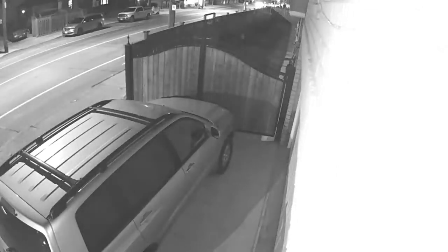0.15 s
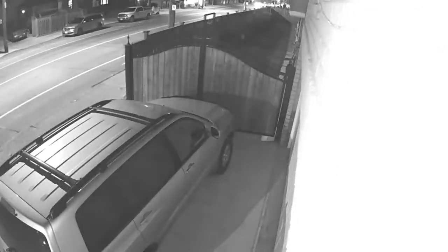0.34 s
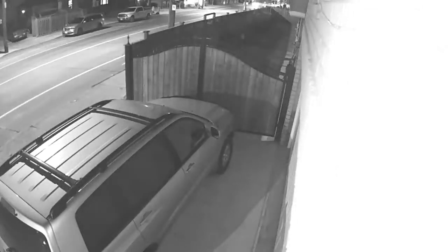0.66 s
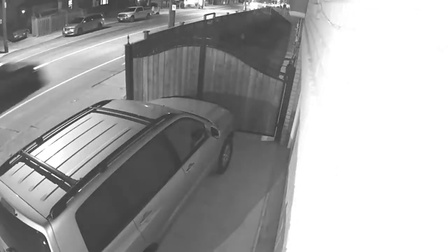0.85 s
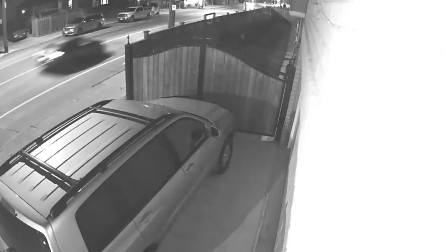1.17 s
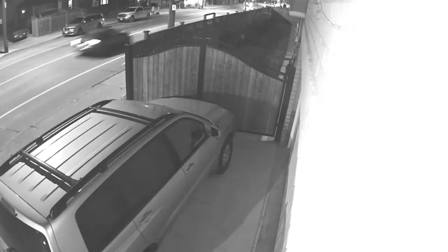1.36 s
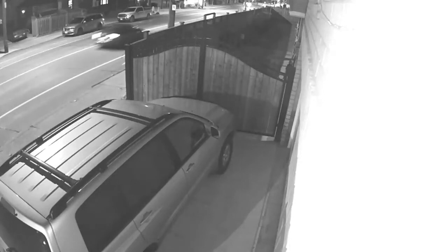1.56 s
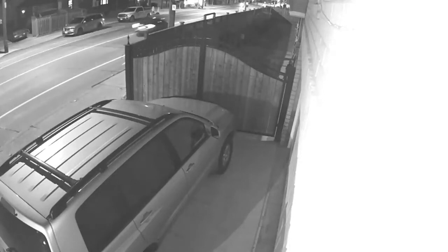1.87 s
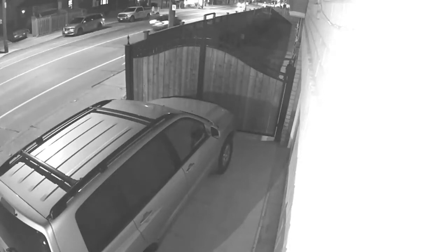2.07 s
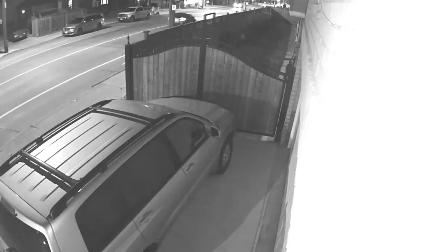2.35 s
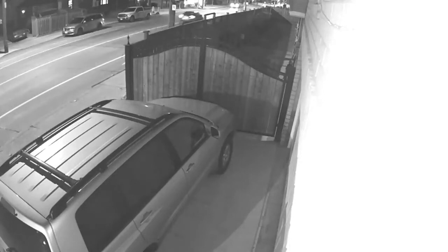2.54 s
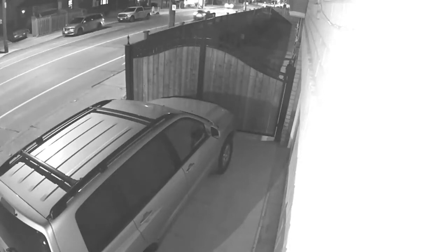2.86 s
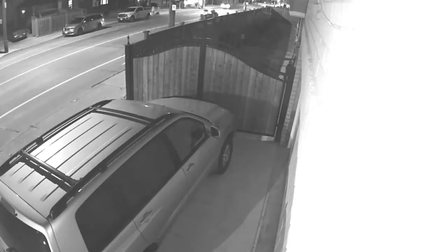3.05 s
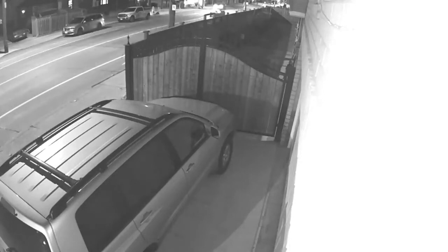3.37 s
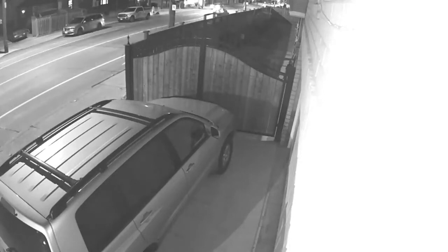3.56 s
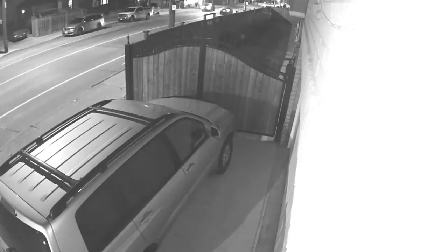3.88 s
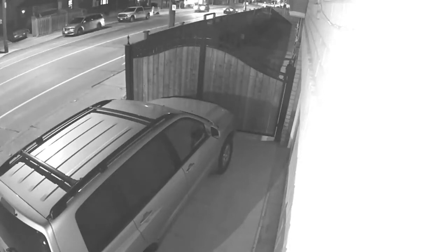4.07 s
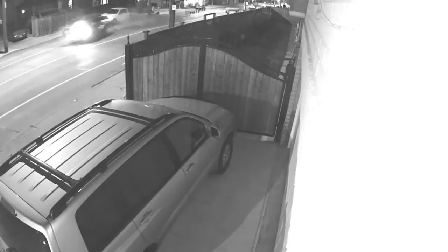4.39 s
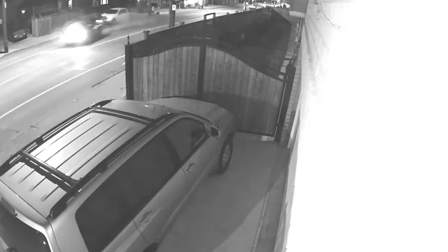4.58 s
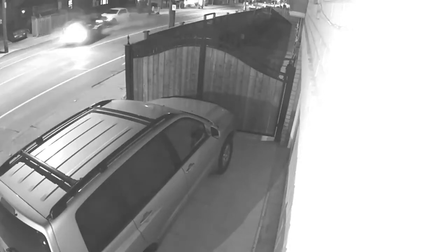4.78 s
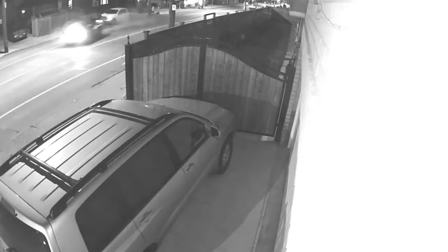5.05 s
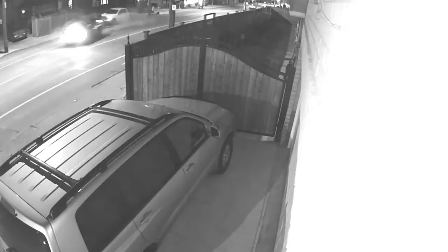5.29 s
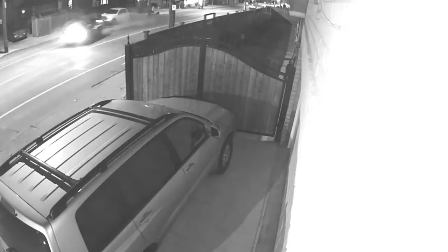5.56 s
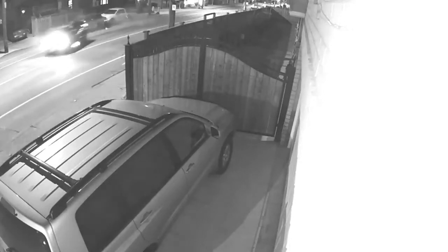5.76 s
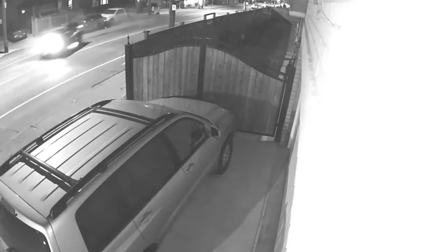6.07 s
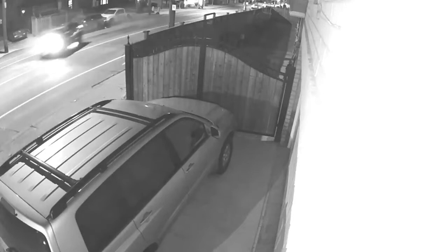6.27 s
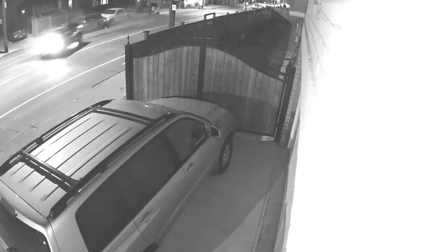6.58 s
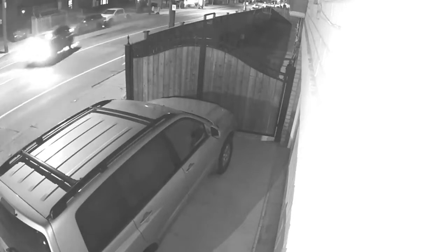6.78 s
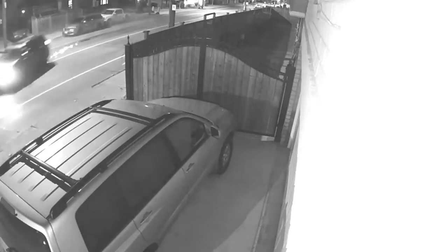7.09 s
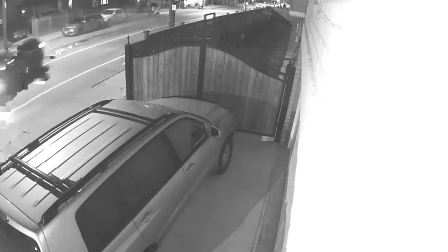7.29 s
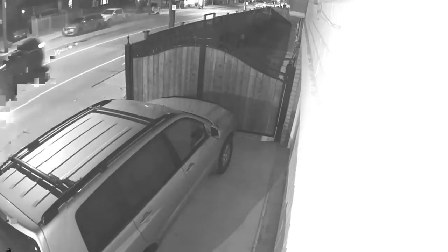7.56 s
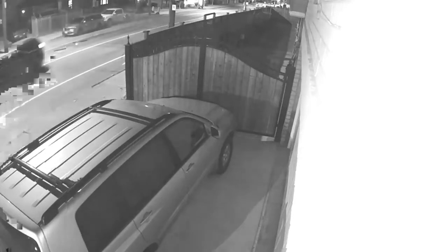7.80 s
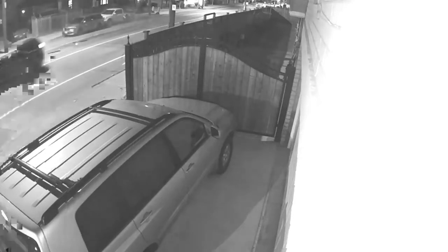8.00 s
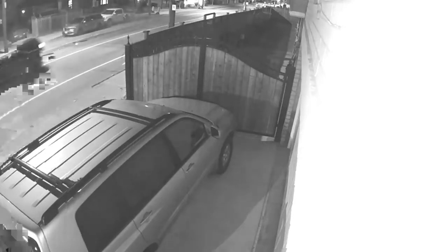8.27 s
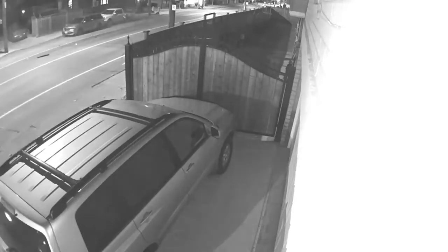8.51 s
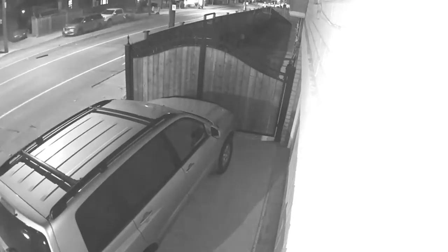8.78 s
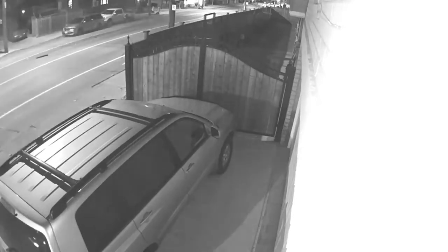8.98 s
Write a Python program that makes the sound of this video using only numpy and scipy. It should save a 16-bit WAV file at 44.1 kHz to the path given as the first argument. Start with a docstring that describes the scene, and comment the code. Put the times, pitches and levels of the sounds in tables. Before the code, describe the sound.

A quiet night street heard through a small, ringing mono microphone. From 0 s a car sweeps past, nearest around 0.5 s, with a soft tyre whoosh, humming tread and low exhaust drone, fading by about 2 s behind a fence. Distant traffic murmurs and its hiss gradually rises; the signal drops out briefly near 4.4 s. At 5.04 s a violent crash hits abruptly and overloads: low thumps, buckling steel, a short squeal and bursting glass, decaying over a second with echo. Sharp knocks clatter at 5.7-5.9 s, and a steel tube rings high around 6.0 s. A heavy blow at 6.17 s starts continuous gritty scraping on asphalt, with loud metallic squeals at 6.5 and 6.8 s. Another tiny cut comes at 7.2 s. Scraping continues with irregular knocks and groans, a cluster of bangs at 8.4-8.7 s, and rough grinding surges past 9 s.

```python
"""A car rolls by on a night street; later another crashes, then metal rings, scrapes and knocks on asphalt.
Tyres are coloured noise shaped by distance and direction; steel and glass are dense random fractures.
A bouncing tube is a set of decaying modes; dragged wreckage is stick-slip grains and squealing bands.
A small mono microphone rings near 2 kHz and overloads, and its signal cuts out twice."""
import sys
import numpy as np
from scipy import signal
from scipy.fft import rfft, irfft
from scipy.io import wavfile
from scipy.ndimage import uniform_filter1d, map_coordinates

SR = 44100
rng = np.random.default_rng(int(sys.argv[2]) if len(sys.argv) > 2 else 0)


def generate_wav(sig):
    """Save sig (samples, or channels by samples) to the path in sys.argv[1] as 16-bit PCM at SR."""
    pcm = np.round(np.clip(np.atleast_2d(sig).T, -1, 1) * 32767).astype(np.int16)
    wavfile.write(sys.argv[1], SR, pcm)


N = 403074
TIME = np.arange(N) / SR
FREQ = np.fft.rfftfreq(N, 1 / SR)
IMPACT_S = 5.0385

# spectrum of metal and grit dragged on asphalt: frequency_hz, level_db
SCRAPE_SPECTRUM = [(30, -7), (90, -13), (160, -9.5), (260, -6), (450, -8.5), (720, -9), (1000, -8.5),
                   (1300, -7.5), (1700, 1.5), (2100, -6), (2500, -5), (4100, -0.5), (6000, -5),
                   (8000, -11.5), (12000, -16.5), (15000, -41)]


def undb(db):
    """Amplitude gain is the exponential of a level in decibels."""
    return 10 ** (np.asarray(db) / 20)


def unit(x):
    """Normalization of signal power: scale to rms 1."""
    return x / np.sqrt(np.mean(x ** 2))


def gains(table):
    """Levels interpolated linearly in decibels give one gain curve per column."""
    s, *columns = np.transpose(table)
    return [undb(np.interp(TIME, s, column)) for column in columns]


def spectrum(points):
    """A spectral envelope in dB, interpolated on a logarithmic frequency axis."""
    hz, db = np.transpose(points)
    return np.interp(np.log(FREQ + 1), np.log(hz), db)


def colour(x, db):
    """Minimum-phase filtering: folding the cepstrum forward makes the response causal."""
    size = 4096
    log_gain = np.log(undb(np.interp(np.fft.rfftfreq(size, 1 / SR), FREQ, db)))
    cepstrum = irfft(log_gain)
    cepstrum[1:size // 2] *= 2
    cepstrum[size // 2 + 1:] = 0
    response = irfft(np.exp(rfft(cepstrum)))
    return signal.oaconvolve(x, response)[:N]


def band(x, lo_hz, hi_hz, order=4):
    """Butterworth band-pass: a maximally flat pass band."""
    edges = [lo_hz, min(hi_hz, SR / 2 - 100)]
    return signal.sosfilt(signal.butter(order, edges, "band", fs=SR, output="sos"), x)


def walk(rate):
    """Slow random fluctuation of rms 1: Gaussian knots, rate per second, joined by straight lines."""
    knots = rng.standard_normal(8192)
    return unit(np.interp(TIME * rate, np.arange(len(knots)), knots))


def grains(rate, spread_db):
    """Shot noise of tiny fractures and slips, rate per second: many weak, a few strong."""
    strength = undb(spread_db * np.minimum(rng.exponential(size=N), 5))
    sign = rng.choice([-1, 1], N)
    return unit((rng.random(N) < rate / SR) * strength * sign)


def fade(t, t60):
    """Exponential damping: the level falls 60 dB in t60 seconds."""
    return np.exp(-np.log(1000) * t / max(t60, 1e-3))


def envelope(start, attack, length, t60):
    """Build-up and decay: rise from start, hold until length has passed, then die away."""
    t = TIME - start
    return np.clip(t / max(attack, 1e-4), 0, 1) * fade(np.maximum(t - length, 0), t60)


def add(out, s, sound):
    """Linear superposition: mix a sound in at time s."""
    i = int(s * SR)
    out[i:i + len(sound)] += sound[:N - i]


def street(x, t60, wet_db):
    """Reverberation: direct sound plus scattered echoes from fence, cars and fronts, with little treble."""
    t = TIME[:SR // 2]
    echoes = rng.standard_normal(len(t)) * fade(t, t60)
    response = band(echoes / np.linalg.norm(echoes), lo_hz=248, hi_hz=5450, order=1) * undb(wet_db)
    response[0] += 1  # direct sound
    return signal.oaconvolve(x, response / np.linalg.norm(response))[:N]


def shifting(x, depth_db, rate, count=70):
    """Moving resonances: narrow peaks swell and fade as the contact point moves over the bent metal."""
    hz, s, frames = signal.stft(x, SR, nperseg=1024)
    peaks = rng.standard_normal((count + 2, 512))
    places = np.meshgrid(count * np.sqrt(hz / hz[-1]), s * rate, indexing="ij")
    swell = undb(depth_db * map_coordinates(peaks, places, order=1))
    return signal.istft(frames * swell, SR)[1][:N]


def singing(table, attack_s, t60):
    """Sustained resonance: each row excites one narrow band for a while, then lets it die away."""
    out, t = np.zeros(N), TIME[:3 * SR]
    for s, length, hz, width, db in table:
        ring = unit(band(rng.standard_normal(len(t)), hz - width / 2, hz + width / 2, order=2))
        add(out, s, ring * undb(db) * envelope(0, attack_s, length, t60)[:len(t)])
    return out


def passing_car(ground_db=-6):
    """Spherical spreading and directivity shape tyre noise until a fence shadows it; the exhaust drones."""
    # tyre noise nearby: frequency_hz, level_db
    tyre_spectrum = [(60, -9), (100, -13), (170, 3), (430, 1.5), (650, -17), (900, -0.5), (1300, 0.5),
                     (1750, -0.5), (2700, -5), (3500, -7), (5000, -14.5), (8000, -24), (12000, -29.5),
                     (15000, -39)]
    # exhaust drones: start_s, length_s, level_db (relative to exhaust_db)
    drone_spells = [(.24, 1.08, -1), (1.74, 0.35, -8)]
    pass_s, speed_m_s, lane_m = 0.46, 15.4, 7.3  # moment, speed and distance of closest approach
    roar_db, rumble_db, hiss_db = -44, -50, -44.5  # at the nearest point
    exhaust_db = -46.5
    roar_horn_db, hiss_horn_db, hiss_ahead_db = 12.5, 7, 5  # tyres beam along the road, hiss mostly forward
    fence_s, fence_db_per_s = 1.14, 7
    ground_lag_s = .0006  # asphalt echo at the nearest point

    along = speed_m_s * (TIME - pass_s)
    distance = np.hypot(along, lane_m)
    bearing, nearness = along / distance, lane_m / distance
    tyres = colour(rng.standard_normal(N), spectrum(tyre_spectrum))
    # the echo off the asphalt catches up as the car leaves, so the whoosh sweeps upward
    scattered = uniform_filter1d(tyres, size=5)  # rough asphalt returns less treble
    echo_time = TIME - ground_lag_s * np.sqrt(nearness)
    tyres = tyres + undb(ground_db) * np.interp(echo_time, TIME, scattered)

    roar = undb(roar_db + roar_horn_db * bearing ** 2) * unit(band(tyres, 490, 2500))
    hiss_level_db = hiss_db + hiss_horn_db * bearing ** 2 - hiss_ahead_db * bearing
    hiss = undb(hiss_level_db) * unit(band(tyres, 3160, 15000))
    rumble = undb(rumble_db) * unit(band(tyres, 26, 760))
    shadow = undb(-fence_db_per_s * np.maximum(TIME - fence_s, 0))
    drone = sum(undb(exhaust_db + db) * envelope(s, 0.14, length, t60=0.55)
                for s, length, db in drone_spells)
    exhaust_hz = 39.7 * (1 + 0.016 * walk(12))
    exhaust = np.sin(2 * np.pi * np.cumsum(exhaust_hz) / SR)
    # faint high hiss of the tyres, weighted slightly towards the departing side
    high_hiss = undb(-71.5 + 3.4 * bearing) * unit(band(tyres, 7860, 14000))
    return nearness * (shadow * (roar + hiss + high_hiss) + rumble) + drone * unit(exhaust)


def traffic(rumble_db=-9.5):
    """Broadband rolling noise: far tyres roar and hiss under the passing car, all echoed by the street."""
    # tyre noise from afar: frequency_hz, level_db
    far_spectrum = [(30, 2.5), (100, -1.5), (300, -8.5), (500, -8.5), (720, -3.5), (970, -0.5),
                    (1200, -4.5), (1420, -5), (1650, -3), (2800, -8.5), (3700, -18.5), (4600, -17.5),
                    (7500, -35.5), (10000, -36.5), (11500, -34), (12500, -38), (15000, -39)]
    # traffic up the street: time_s, tread_roar_db, hiss_db
    far_levels = [(1.5, -45.5, -56), (2.6, -46, -53), (3.2, -45.5, -50.5), (3.6, -47.5, -53.5),
                  (3.95, -46, -49), (4.65, -45, -47), (5.04, -43.5, -45)]
    roar, hiss = gains(far_levels)
    noise = colour(rng.standard_normal(N), spectrum(far_spectrum))
    treads = unit(band(noise, 560, 2480)) + undb(rumble_db) * unit(band(noise, 28, 555))
    far = roar * treads + hiss * unit(band(noise, 2940, 15000))
    return street(far + passing_car(), t60=0.25, wet_db=-9.5) * undb(0.51 * walk(24))


def tread_hums():
    """Narrow-band resonance: tyre treads hum on the road."""
    # hums: start_s, length_s, frequency_hz, width_hz, level_db
    hum_bands = [(0, 0.19, 1800, 280, -41.5), (0, .45, 935, 200, -47), (.75, 0.57, 2140, 300, -52),
                 (1.8, 2.4, 953, 65, -52.5), (1.4, 2.0, 1420, 70, -51.5), (4.1, 1.1, 2320, 110, -51)]
    return singing(hum_bands, attack_s=0.078, t60=1.7)


def collision(attack_s=0.0022):
    """Impulsive fracture: panels buckle in dense cracks, the bodies boom, glass bursts and rains down."""
    # crumpling bodywork and glass: frequency_hz, level_db
    crumple_spectrum = [(30, -2), (90, -1.5), (170, 0.5), (450, -2.5), (700, -4.5), (1000, -9.5),
                        (1700, -7), (2300, -0.5), (3000, -0.5), (4000, -2.5), (6000, -5), (8000, -13.5),
                        (11000, -16), (15000, -39)]
    steel_db, steel_hold_s, steel_t60_s = -13.5, .2, 0.88
    glass_db, glass_hold_s, glass_t60_s = -13, 0.22, 0.78
    boom_db, boom_rise_s, boom_hold_s, boom_t60_s = -22, 0.034, 0.048, 2.14
    # small debris keeps falling; level relative to steel and glass
    settle_db, settle_hold_s, settle_t60_s = -21.5, 0.76, 4.1

    settle = undb(settle_db) * envelope(IMPACT_S, attack_s, settle_hold_s, settle_t60_s)
    steel = undb(steel_db) * np.hypot(envelope(IMPACT_S, attack_s, steel_hold_s, steel_t60_s), settle)
    glass = undb(glass_db) * np.hypot(envelope(IMPACT_S, attack_s, glass_hold_s, glass_t60_s), settle)
    boom = undb(boom_db) * envelope(IMPACT_S, boom_rise_s, boom_hold_s, boom_t60_s)
    tone = spectrum(crumple_spectrum)
    cracks = street(colour(grains(rate=5000, spread_db=3.5), tone), t60=0.93, wet_db=-4.5)
    shards = street(colour(grains(rate=7000, spread_db=1.5), tone), t60=.15, wet_db=-9.0)
    cracks = shifting(cracks, depth_db=1.0, rate=16)
    wreck = steel * unit(band(cracks, 267, 2730)) + boom * unit(band(cracks, 22, 197))
    return wreck + glass * unit(band(shards, 2430, 17200))


def squeals():
    """Narrow-band resonance: steel edges squeal, panels groan, the ringing tube sings briefly near 3.4 kHz."""
    # squeals, groans and the tube's brief note: start_s, length_s, frequency_hz, width_hz, level_db
    squeal_bands = [(5.06, 0.061, 2320, 201, -19.5), (5.03, 0.058, 2830, 600, -13),
                    (5.12, 0.16, 2990, 350, -26), (6.2, .11, 2140, 345, -23),
                    (6.24, 0.11, 4300, 500, -21.5), (6.52, 0.23, 4250, 554, -15),
                    (6.81, 0.13, 4040, 303, -16.5), (6.86, 0.069, 5100, 700, -18),
                    (7.01, 0.12, 315, 40, -27.5), (7.06, 0.052, 2170, 120, -31),
                    (7.23, 0.17, 351, 60.5, -35.5), (7.28, 0.12, 4880, 110, -30),
                    (7.23, 0.7, 3930, 120, -32), (7.955, 0.014, 4140, 110, -17.5),
                    (8.05, .13, 3930, 199, -23), (8.07, .15, 1980, 160, -28), (8.28, 0.069, 464, 80, -30),
                    (8.47, 0.067, 2540, 120, -23), (8.53, .11, 597, 119, -35.5),
                    (8.68, 0.21, 492, 50, -33.5), (8.85, 0.057, 3220, 500, -21.5),
                    (8.98, 0.02, 3750, 600, -14), (6.045, 0.082, 3440, 70, -31),
                    (6.13, 0.027, 2160, 400, -33.5)]
    return singing(squeal_bands, attack_s=0.015, t60=.17)


def knocks(crush_s=0.00066):
    """Damped impact: each blow is a short crunch of sheet metal; the car's weight lands in low thumps."""
    # parts and panels striking the road: start_s, level_db, brightness_db (relative to the blow)
    blows = [(5.6994, -21, -3.5), (5.7733, -8.5, -5.5), (5.8152, -11, -12), (5.8426, -8.5, -0.5),
             (5.8634, -18, -17), (5.9044, -15, -18), (6.1664, 4.5, -22), (6.4687, -8, -11),
             (6.5306, -6, -2), (7.0818, -2, -10), (7.2669, -10, -9), (7.2988, -11, 1), (7.3253, 2, -24),
             (7.3492, -8, -14), (7.5877, -6, -3.5), (7.7518, -16, -10), (7.9004, -10, 3), (8.4048, -6, 2),
             (8.5504, -3.5, -4), (8.5914, -0.5, -7.5), (8.6338, -2, -6), (8.6792, -1.5, -1.5),
             (9.0424, -15, 8), (9.1134, -14, 9)]
    # the heavy body striking and landing: start_s, level_db, pitch_hz
    landings = [(5.119, -4, 156), (5.124, -5, 90), (5.272, -19, 160), (6.228, -16, 130), (6.275, -22, 100),
                (6.567, -19, 100), (8.179, -23, 85), (8.859, -23, 130), (9.11, -19, 160)]
    t = TIME[:SR // 4]
    dull, bright, low = np.zeros((3, N))
    for s, db, bright_db in blows:
        crunch = rng.standard_normal(len(t)) * (1 - np.exp(-t / crush_s)) * fade(t, t60=0.051) * undb(db)
        add(dull, s, crunch)
        add(bright, s, crunch * undb(bright_db))
    for s, db, hz in landings:
        push = 1 - np.exp(-t / 0.00083)
        add(low, s, undb(db) * np.sin(2 * np.pi * hz * t) * push * fade(t, t60=0.048))
    panels = undb(1.0) * band(dull, 1830, 2460, order=2)
    panels += undb(0.5) * colour(band(bright, 2600, 13000), spectrum(SCRAPE_SPECTRUM))
    return street(panels + low, t60=0.11, wet_db=-1.0)


def tube(contact_s=0.00072):
    """Modal ringing: each bounce of a steel tube renews its modes; skating friction keeps some singing."""
    # modes of the tube: frequency_hz, level_db, t60_s
    tube_modes = [(3780, -11, 0.12), (4010, 8, 0.17), (4090, -29, .12), (6385, -16, 0.17),
                  (7040, -4, 0.061), (7190, -13, .14), (8900, -11, 0.2), (8800, -18, .12),
                  (12040, -9.5, 0.14)]
    # bounces: start_s, level_db
    bounces = [(6.015, -20), (6.033, -17.5), (6.086, -25)]
    # partials sustained by friction: frequency_hz, level_db
    friction_partials = [(3430, -15), (3990, 0.5), (11990, -17)]
    skate_s, skate_attack_s, skate_hold_s, skate_t60_s = 6.036, .014, .017, .14
    skate_db, sag_per_s = -16, 0.11  # sag: fraction of the pitch lost per second

    out, t = np.zeros(N), TIME[:SR // 2]
    push = 1 - np.exp(-t / contact_s)
    for s, db in bounces:
        for hz, mode_db, t60 in tube_modes:
            detune, strength = rng.standard_normal(2)
            ring = np.sin(2 * np.pi * hz * (1 + .003 * detune) * t) * push * fade(t, t60)
            add(out, s, ring * undb(db + mode_db + 1.3 * strength))
    skate = undb(skate_db + 4.2 * walk(70)) * envelope(skate_s, skate_attack_s, skate_hold_s, skate_t60_s)
    pitch = 1 - sag_per_s * np.clip(TIME - skate_s, 0, .5) + 0.00299 * walk(150)
    for hz, db in friction_partials:
        out += undb(db) * skate * np.sin(2 * np.pi * hz * np.cumsum(pitch) / SR)
    return street(out, t60=0.65, wet_db=-10)


def skid():
    """Stick-slip friction: each slip shakes panels and grinds grit, harder where an edge digs in."""
    # edges digging in: start_s, length_s, panel_db, rumble_db, grit_db (relative to the steady scrape)
    edge_digs = [(6.185, 0.094, 9, 17.5, 5.5), (6.305, 0.038, 8.5, 2, 6), (6.507, 0.3, 7, 9, 9.5),
                 (6.801, 0.14, 9, 7.5, 9), (7.028, 0.057, -0.5, 4, 6), (7.215, 0.15, -1.5, 0, -4.5),
                 (7.67, 0.043, -8, 4, 1), (7.946, .08, -1, -6, 3.5), (8.106, 0.12, 1, 2, 9),
                 (8.379, 0.068, -1.5, -14, 8), (8.519, 0.092, -3, -1, 6.5), (8.669, 0.056, 1.5, -13, 5),
                 (8.802, 0.1, 4.5, 16, 11), (8.959, 0.043, 2.5, 11, 8.5), (9.09, 0.044, 1, 22, 7)]
    # resonances of the dragged body: frequency_hz, width_hz, level_db
    body_modes = [(427, 260, -41.5), (2054, 170, -35.5)]
    skid_s, dig_attack_s, dig_t60_s = 6.164, 0.038, 0.42
    panel_db, rumble_db, grit_db = -27, -45.5, -26  # steady scrape at the start
    nearing_db_per_s = 0.36  # it grows as the wreck comes closer

    sliding = TIME >= skid_s
    power = np.ones((3, N))
    for s, length, *db in edge_digs:
        power += np.outer(undb(db), envelope(s, dig_attack_s, length, dig_t60_s)) ** 2
    panel, rumble, grit = np.sqrt(power) * sliding * undb(nearing_db_per_s * (TIME - skid_s))
    tone = spectrum(SCRAPE_SPECTRUM)
    judder = undb(0.97 * walk(90))
    slips = street(colour(grains(rate=4000, spread_db=1.5) * judder, tone), t60=0.27, wet_db=-5.5)
    stones = street(colour(grains(rate=7000, spread_db=0.5) * judder, tone), t60=0.05, wet_db=-5)
    slips = shifting(slips, depth_db=4.0, rate=8, count=130)
    stones = shifting(stones, depth_db=4.0, rate=8, count=130)
    body = np.zeros(N)
    for hz, width, db in body_modes:
        swell = undb(db + 5.7 * walk(6.5))  # the resonance comes and goes
        body += swell * unit(band(rng.standard_normal(N), hz - width / 2, hz + width / 2, order=2))
    wreck = undb(panel_db) * panel * unit(band(slips, 215, 2880))
    wreck += undb(rumble_db) * rumble * unit(band(slips, 31, 309))
    return wreck + undb(grit_db) * grit * unit(band(stones, 2790, 18500)) + body * sliding


def scene():
    """Superposition of sources at one microphone; the wreck is silent before the impact."""
    road = traffic() + tread_hums()
    wreck = collision() + skid() + squeals() + knocks() + tube()
    return np.tile(road + wreck * (TIME >= IMPACT_S), (2, 1))


def record(dry, ceiling=0.62, knee=5):
    """Resonance and saturation: the housing colours, the input overloads, the signal drops out, treble is cut."""
    # microphone housing resonances: frequency_hz, width_hz, level_db
    housing_modes = [(269.4, 37.5, -7), (2106, 272, 8.5), (2330, 117, 5), (2424, 200, -4.5),
                     (13500, 400, -3), (13930, 470, 8)]
    # signal losses: start_s, end_s, stuck_level (amplitude held at first, then silence)
    signal_losses = [(4.338, 4.478, -.008), (7.166, 7.230, .021)]
    stuck_s, top_hz = .023, 14600
    housing_db = sum(db * np.exp(-((FREQ - hz) / width) ** 2) for hz, width, db in housing_modes)
    x = colour(dry.mean(axis=0), housing_db)
    x = x / (1 + np.abs(x / ceiling) ** knee) ** (1 / knee)
    for start, end, stuck in signal_losses:
        x = np.where((TIME < start) | (TIME > end), x, stuck * (TIME < start + stuck_s))
    low_pass = signal.ellip(8, .2, 70, top_hz, fs=SR, output="sos")
    return np.tile(signal.sosfilt(low_pass, x), (2, 1))


dry = scene()
out = record(dry)
generate_wav(out)
```